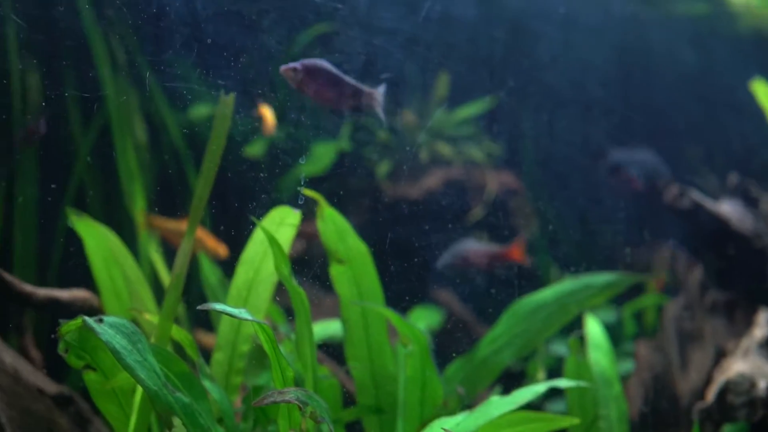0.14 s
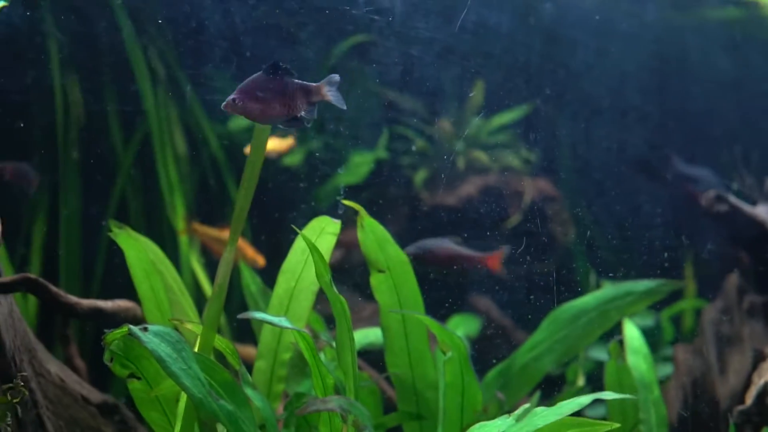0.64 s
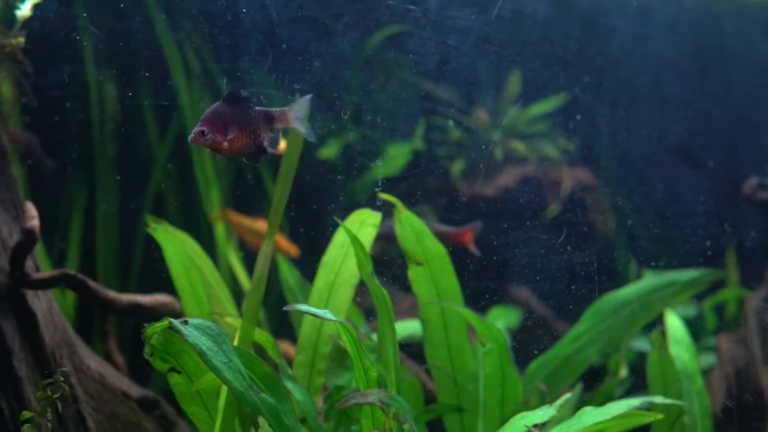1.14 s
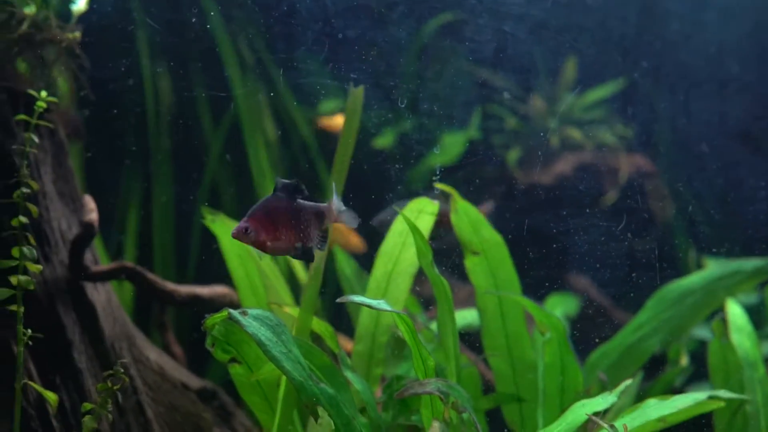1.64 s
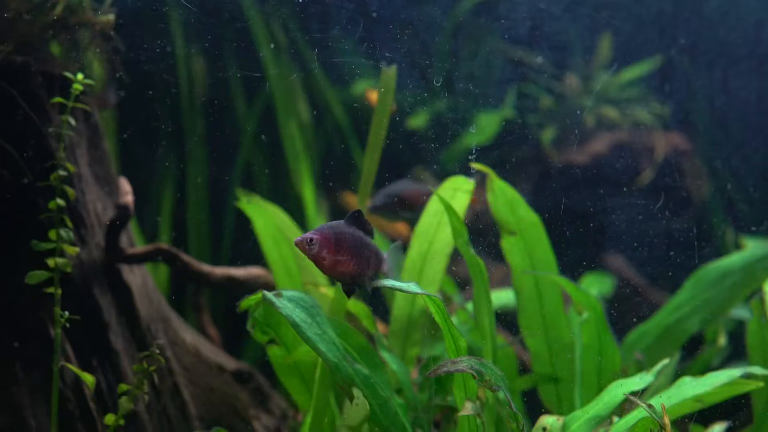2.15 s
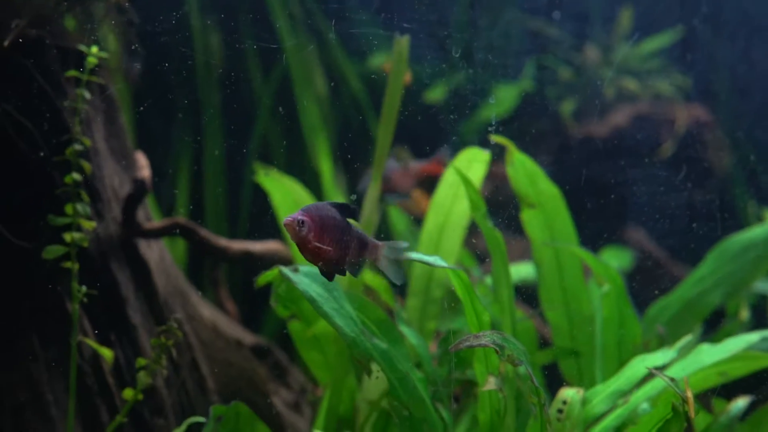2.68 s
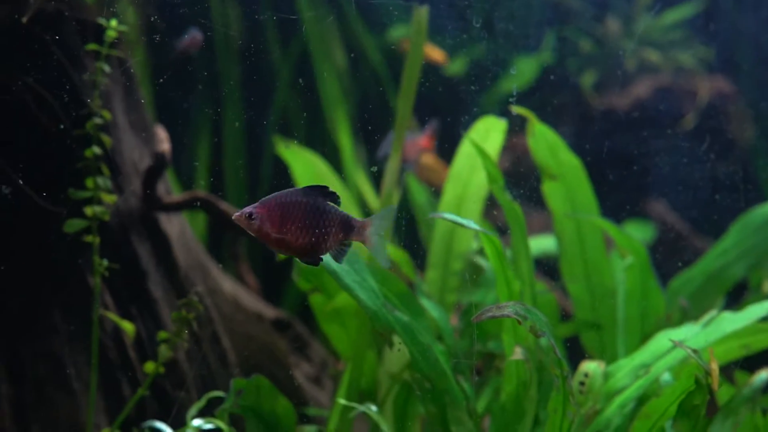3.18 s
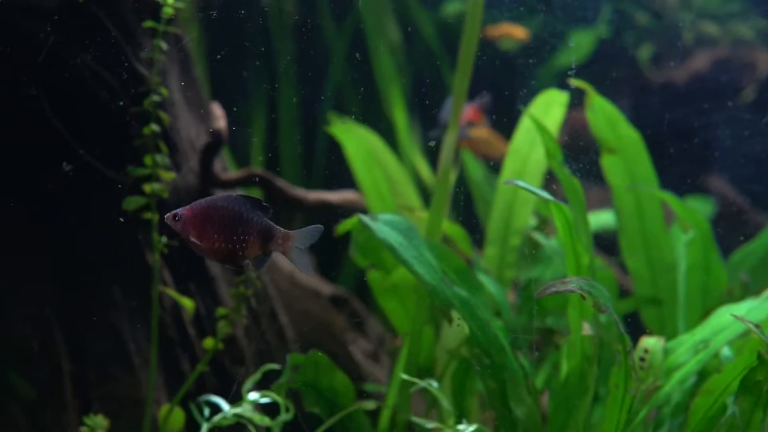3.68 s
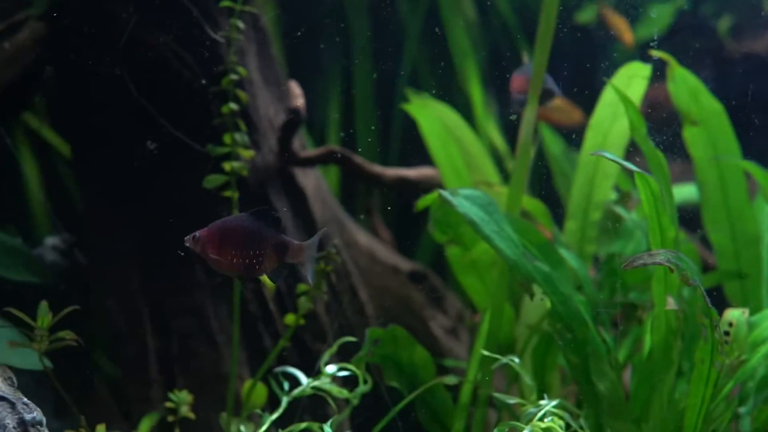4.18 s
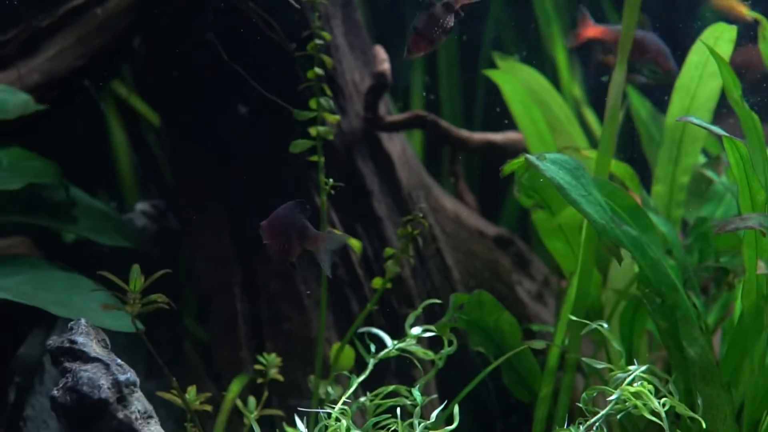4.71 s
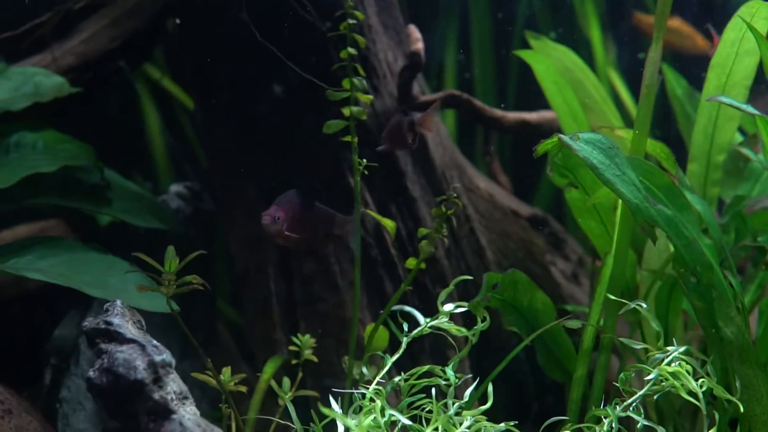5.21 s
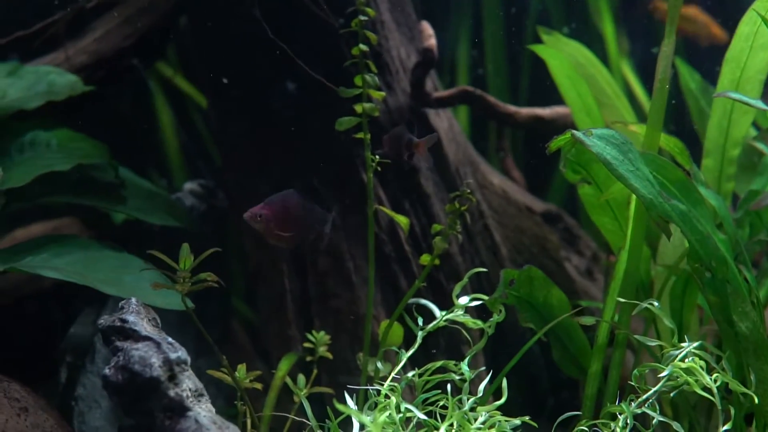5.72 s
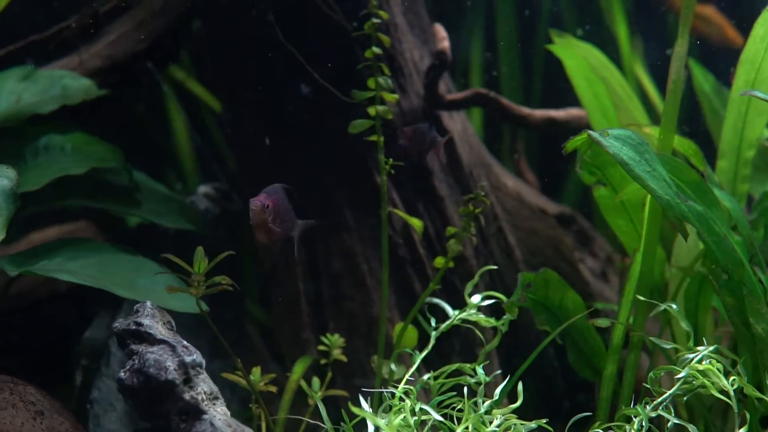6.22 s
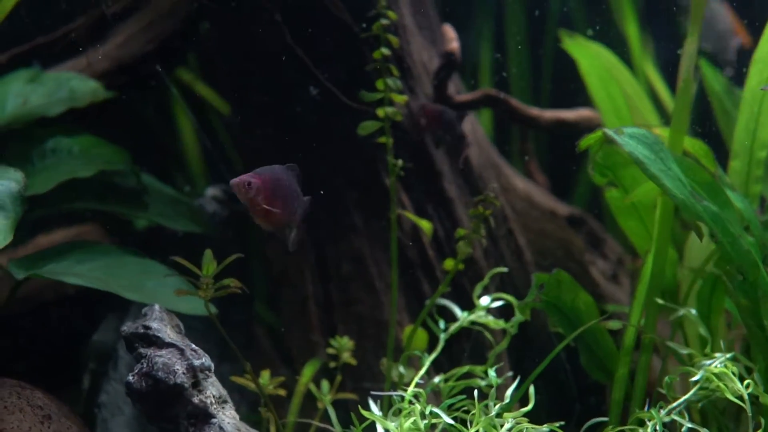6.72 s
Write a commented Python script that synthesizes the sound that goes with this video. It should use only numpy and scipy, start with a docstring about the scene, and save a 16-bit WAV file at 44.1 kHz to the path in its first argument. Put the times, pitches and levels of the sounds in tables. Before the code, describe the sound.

Steady electric pump hum over a soft low rumble, faint watery trickle with scattered ringing drips, and a tiny rapid ticking close by.

```python
"""In a quiet room a mains-driven aquarium pump hums in steady harmonics, with a second tone beside them.
Low rumble swells beneath: wavering sines and noise narrowed to the room's resonances. Water trickles back
as flickering bands of stereo noise, with clear ringing drops and tiny splashes of narrow noise.
Close to the microphones a small lens drive ticks about sixty times a second, rattling its housing,
and fingers shift, click and rustle on it in short bursts of filtered noise."""
import sys
import numpy as np
from scipy import signal
from scipy.io import wavfile
from scipy.ndimage import uniform_filter1d

SR = 44100
rng = np.random.default_rng(int(sys.argv[2]) if len(sys.argv) > 2 else 0)


def volts_from_db(level):
    """Convert decibel levels to linear amplitude ratios."""
    exponent = np.asarray(level, float) / 20
    return 10 ** exponent


def generate_wav(signal):
    """Clip the signal to [-1, 1] and save it as 16-bit WAV at the path in sys.argv[1]."""
    frames = np.transpose(np.atleast_2d(signal))
    scaled = np.clip(frames, -1, 1) * 32767
    pcm = np.round(scaled).astype(np.int16)
    wavfile.write(sys.argv[1], SR, pcm)


N = 302526
T = np.arange(N) / SR

# pump harmonics: [multiple of the mains, level/dB rms]
PUMP_HARMONICS = [(2, -60.5), (3, -49.5), (4, -42.5), (5, -44.5), (6, -61), (8, -60.5), (10, -80.5),
                  (12, -80)]
# deepest rumble, like a far engine that speeds up: [t/s, level/dB rms, f/Hz]
DEEP_RUMBLE = [(0, -62, 30.7), (.55, -50, 30.7), (1.0, -48.5, 31.8), (1.3, -59, 30.1), (2.15, -60, 29.1),
               (2.49, -35, 30.87), (2.73, -58, 30.9), (3.1, -53, 30.96), (3.68, -47, 29.9),
               (4.0, -63, 28.96), (4.15, -48, 28.6), (4.99, -35, 30.4), (5.33, -33, 31.24),
               (5.52, -36.5, 31.9), (5.75, -54, 31.75), (5.88, -40, 32.14), (6.34, -52, 38),
               (6.86, -54, 42.5)]
# lowest hum, which wavers: [t/s, level/dB rms]
LOWEST_HUM = [(0, -50), (.23, -45), (.9, -48.5), (1.09, -67), (1.36, -40.5), (1.95, -48), (2.65, -58),
              (3.05, -40.5), (3.32, -45.5), (3.74, -40.5), (4.03, -44.5), (4.34, -42.5), (5.2, -49.5),
              (5.54, -40), (5.98, -56), (6.19, -42), (6.5, -47), (6.86, -43.5)]
# swells of the drone: [centre t/s, level at the centre/dB rms, length/s, f/Hz]
DRONE_SWELLS = [(0.805, -54, .3, 86.5), (2.31, -49, .2, 80), (4.297, -50, .45, 85.4), (4.87, -51, .4, 90.5),
                (6.351, -51.5, 0.47, 77)]
# room resonances: [f/Hz, width/Hz, level against the rumble curve/dB]
ROOM_MODES = [(27.3, 8.9, -5), (51.2, 14.4, -4.5), (118, 11, -11.5), (149.2, 16.2, -5.5), (182, 10, -13.5),
              (210.5, 15, 1), (242.1, 29.7, -4), (289, 25, -17)]
# rumble curve for all the room resonances: [t/s, level/dB]
ROOM_RUMBLE = [(0, -46.5), (1.3, -47), (2.4, -48), (2.85, -46.5), (3.9, -47.5), (4.6, -45.5), (5.5, -47.5),
               (6.2, -49), (6.86, -45.5)]
# boom: [t/s, level/dB rms]
BOOM_LEVEL = [(0, -53.5), (.7, -61), (3.7, -61), (4.1, -54.5), (4.97, -52), (5.25, -61), (6.86, -62.5)]
# trickle and its fizz over time: [t/s, water level/dB, fizz level/dB]
TRICKLE_LEVELS = [(0, -52.5, -64.5), (.5, -53, -68), (1.0, -54.5, -68.5), (1.95, -55, -66.5),
                  (3.8, -55, -68.5), (4.55, -55, -63.5), (5.9, -56.5, -68), (6.57, -57.5, -68.5),
                  (6.86, -55.5, -67)]
# tone colour of the trickle: [f/Hz, relative level/dB]
WATER_SPECTRUM = [(60, -25.5), (180, -4), (400, 2.5), (550, 2), (850, 2), (1100, 0), (1500, -2.5),
                  (2000, -7.5), (3200, -11.5), (4200, -12), (5500, -21), (11000, -33.5)]
# how alike the trickle is left and right: [f/Hz, likeness 0-1]
WATER_LIKENESS = [(60, .9), (200, 0.21), (400, 0.34), (600, 0.59), (1200, 0.42), (2500, 0.21),
                  (5000, 0.089), (11000, 0.27)]
# resonances of the air above the water: [f/Hz, width/Hz, level against the plain trickle/dB]
AIR_RESONANCES = [(887, 41, -24), (1310, 130, -16.5), (1480, 39, -3), (1720, 50, -14), (2560, 210, -2),
                  (3000, 180, -13.5)]
# resonances of the lens drive's housing: [f/Hz, relative level/dB, t60/s]
HOUSING_RESONANCES = [(1770, 8.5, 0.0053), (3745, -3, 0.021), (3964, -3.5, 0.015), (4190, -8, 0.019),
                      (6020, -7.5, 0.0048)]
# clear drops: [t/s, level before swell and decay/dB, f/Hz, roughness (0 smooth, 1 all shaken)]
CLEAR_DROPS = [(.059, -44, 1350, 0), (.432, -53, 2880, 0.5), (1.817, -38.5, 2180, .3),
               (1.876, -48, 2940, .9), (1.93, -53, 3000, .9), (2.661, -34.5, 2974, .3),
               (2.682, -42, 2040, 0.36), (2.757, -39, 1520, 0.56), (3.814, -40.5, 2035, 0.18),
               (3.945, -47, 3270, .3), (4.1, -49, 2140, 0.3), (4.17, -49, 1480, 0.54),
               (4.448, -39, 2265, 0.6), (4.59, -44.5, 3140, 0.48), (4.879, -42, 2071, 0.75),
               (5.155, -45, 4555, 0.4), (5.24, -50.5, 2380, 0.91), (5.71, -50, 2564, 1.05),
               (5.773, -46.5, 2230, .8), (5.877, -34, 2406, 0.12), (6.26, -48, 2290, 0.7)]
# tiny splashes: [t/s, level before swell and decay/dB rms, f/Hz]
TINY_SPLASHES = [(0.591, -56, 10100), (.6, -64, 6100), (.813, -65, 8900), (1.222, -58, 5940),
                 (1.223, -62, 7800), (1.88, -58.5, 8340), (1.95, -54.5, 8800), (2.495, -66, 9000),
                 (2.92, -61, 5000), (3.19, -63, 5560), (3.845, -64, 7330), (4.077, -62, 7400),
                 (4.127, -61, 9050), (4.401, -60, 9600), (4.6, -63, 8310), (4.655, -65, 8270),
                 (4.993, -58, 6000), (4.995, -62, 10000), (5.068, -56, 5200), (5.711, -57, 5400),
                 (5.894, -61, 7500)]
# finger clicks on the housing: [t/s, peak level before panning/dB, low edge f/Hz, high edge f/Hz, L-R level/dB]
FINGER_CLICKS = [(4.4544, -34.5, 2800, 10900, -2), (5.5005, -37, 397, 1110, -1),
                 (5.5105, -43, 3200, 9500, -6)]

MAINS_HZ, FIRST_STROKE_S = 50.0935, .0071
SECOND_TONE_HZ, SECOND_TONE_DB = 143.89, -57
DRONE_HZ, DRONE_WIDTH_HZ, DRONE_DB, SWELL_WIDTH_HZ = 83.2, 12, -58.5, 3.9
BOOM_HZ, BOOM_WIDTH_HZ = 337.4, 92
WATER_LEFT_OVER_RIGHT_DB = 1
WHISTLE_HZ, WHISTLE_WIDTH_HZ = 865, 35
WHISTLE_DB, WHISTLE_HOLD_S, WHISTLE_FADE_DB_PER_S = -67, 1.6, 4
HANDS_DB, HANDS_LUMPY_DB = -66.5, 5.5
STEPS_PER_S, FIRST_STEP_S = 59.94, .0008
ODD_STEP_SHIFT_S = -.0014  # every other step comes early
STEP_DB = -56  # strength that drives the rattle
RATTLE_SHARED = 0.46  # share of the rattle that both microphones hear alike
DROP_T60_S, DROP_SWELL_S, DROP_TAIL_DB, DROP_TAIL_T60_S = 0.083, 0.009, -14.5, 0.58
SHAKE_WIDTH = 0.043  # half-width of the shaken band, as a share of the drop's pitch
ROOM_T60_S, WALL_CUT_HZ, ROOM_DB = .45, 7000, -15
SPLASH_T60_S, SPLASH_SWELL_S, SPLASH_TAIL_DB, SPLASH_TAIL_T60_S = 0.083, 0.0043, -9, 0.49
RUSTLE_START_S, RUSTLE_LENGTH_S, RUSTLE_DB, RUSTLE_SAG_DB_PER_S = 6.635, 0.131, -50, 58
TOP_CUT_HZ = 11030


def rms_one(x):
    """Scales to unit rms."""
    return x / np.sqrt(np.mean(x ** 2) + 1e-20)


def in_time(rows):
    """Table columns as curves, sample by sample."""
    s, *columns = np.transpose(rows)
    return [np.interp(T, s, c) for c in columns]


def at_hz(points, hz):
    """Reads a spectrum on a log-frequency axis."""
    point_hz, value = np.transpose(points)
    return np.interp(np.log(hz), np.log(point_hz), value)


def drift(rate):
    """Slow random wander of unit rms, smoothed by two poles at rate Hz."""
    r = np.exp(-80 * np.pi * rate / SR)  # one point every 40 samples
    slow = signal.lfilter([1], [1, -2 * r, r * r], rng.standard_normal(N // 40 + 2002))
    slow = rms_one(slow[2000:])  # past the filter's start-up
    return np.interp(np.arange(N) / 40, np.arange(len(slow)), slow)


def band(x, low_hz, high_hz):
    """Second-order band-pass."""
    return signal.sosfilt(signal.butter(2, [low_hz, high_hz], "band", fs=SR, output="sos"), x)


def ring(clicks, hz, t60):
    """A unit click sets a decaying sine of starting height 1 ringing."""
    r, w = volts_from_db(-60 / (t60 * SR)), 2 * np.pi * hz / SR
    return signal.lfilter([0, np.sin(w)], [1, -2 * r * np.cos(w), r * r], clicks + 1e-18)


def resonant_noise(hz, width_hz):
    """Noise of unit rms in one resonance, already sounding at the start."""
    noise = rng.standard_normal(N + SR // 2)
    return rms_one(band(noise, hz - width_hz / 2, hz + width_hz / 2)[-N:])


def dying(t, t60, tail_db, tail_t60):
    """A quick decay that gives way to a fainter, longer tail."""
    return volts_from_db(-60 * t / t60) + volts_from_db(tail_db - 60 * t / tail_t60)


def pump():
    """Every stroke is alike, so the harmonics keep in step; the left hears them a little later."""
    t = T - FIRST_STROKE_S + np.array([[-1], [1]]) * 2.5e-5
    hum = sum(volts_from_db(db) * np.cos(2 * np.pi * k * MAINS_HZ * t) for k, db in PUMP_HARMONICS)
    second_tone = volts_from_db(SECOND_TONE_DB) * np.sin(2 * np.pi * SECOND_TONE_HZ * t)
    return np.sqrt(2) * (hum + second_tone)  # rms to peak


def rumble():
    """Far rumble fills the room resonances; the deepest is nearly a tone, the lowest hum wavers."""
    deep_db, deep_hz = in_time(DEEP_RUMBLE)
    deep_cycles = np.cumsum(deep_hz) / SR + 0.05 * drift(0.57)
    deep = np.sqrt(2) * volts_from_db(deep_db) * np.sin(2 * np.pi * deep_cycles)
    lowest_cycles = MAINS_HZ * T + 0.15 * drift(0.98)
    lowest = np.sqrt(2) * volts_from_db(in_time(LOWEST_HUM)[0]) * np.sin(2 * np.pi * lowest_cycles)
    drone = volts_from_db(DRONE_DB) * resonant_noise(DRONE_HZ, DRONE_WIDTH_HZ)
    swells = 0
    for s, db, length, hz in DRONE_SWELLS:
        rise_and_fall = np.exp(-2 * ((T - s) / length) ** 2)
        swells = swells + volts_from_db(db) * rise_and_fall * resonant_noise(hz, SWELL_WIDTH_HZ)
    modes = sum(volts_from_db(db) * resonant_noise(hz, width_hz) for hz, width_hz, db in ROOM_MODES)
    boom = volts_from_db(in_time(BOOM_LEVEL)[0]) * resonant_noise(BOOM_HZ, BOOM_WIDTH_HZ)
    return deep + lowest + drone + swells + volts_from_db(in_time(ROOM_RUMBLE)[0]) * modes + boom


def air_above_water(x):
    """Adds the narrow resonances of the air to the sound that passes."""
    out = x
    for hz, width_hz, db in AIR_RESONANCES:
        r = np.exp(-np.pi * width_hz / SR)
        poles = [1, -2 * r * np.cos(2 * np.pi * hz / SR), r * r]
        out = out + volts_from_db(db) * signal.lfilter([(1 - r * r) / 2, 0, (r * r - 1) / 2], poles, x)
    return out


def trickle(patchy_db):
    """Third-octave bands of stereo noise, each with its level, flicker and likeness; fizz on top."""
    water, together = 0, drift(6.0)
    edges = 56 * 2 ** (np.arange(24) / 3)
    white = rng.standard_normal((2, 2, N))
    for k, (low, high) in enumerate(zip(edges, edges[1:])):
        mid, side = band(white[k % 2], low, high)  # neighbouring bands use separate noise
        hz = np.sqrt(low * high)
        alike = np.clip(at_hz(WATER_LIKENESS, hz), 0, 1)
        flicker_db = patchy_db * (.5 * together + drift(21))
        stereo = np.sqrt(1 + alike) * mid + np.sqrt(1 - alike) * side * [[1], [-1]]
        water = water + volts_from_db(at_hz(WATER_SPECTRUM, hz) + flicker_db) * stereo
    water_db, fizz_db = in_time(TRICKLE_LEVELS)
    noise = rng.standard_normal((3, N))
    fizz = rms_one(band(noise[:2] + 0.4 * noise[2], 3660, 12700))
    balance_db = WATER_LEFT_OVER_RIGHT_DB * np.array([[.5], [-.5]])
    water = volts_from_db(water_db + balance_db) * rms_one(air_above_water(water))
    return water + volts_from_db(fizz_db + patchy_db * together) * fizz


def whistle():
    """The trickle sings weakly in one narrow noise band that holds, then fades."""
    fade_db = WHISTLE_FADE_DB_PER_S * np.maximum(T - WHISTLE_HOLD_S, 0)
    return volts_from_db(WHISTLE_DB - fade_db) * resonant_noise(WHISTLE_HZ, WHISTLE_WIDTH_HZ)


def hands():
    """The held housing shifts a little: lumpy low noise, opposite in the two microphones."""
    noise = rms_one(band(rng.standard_normal(N), 85, 330))
    return volts_from_db(HANDS_DB + HANDS_LUMPY_DB * drift(3.0)) * noise * [[1], [-1]]


def lens_drive(habit_db, chance_db):
    """Steps come in fours, each place of slowly changing strength; each rattles the housing briefly."""
    k = np.arange(int(N / SR * STEPS_PER_S) - 1)
    at = np.round((FIRST_STEP_S + k / STEPS_PER_S + ODD_STEP_SHIFT_S * (k % 2)) * SR).astype(int)
    habits = np.tanh([drift(1.3) for place in range(4)])
    chance = 2 * rng.random(len(k)) - 1
    steps = np.zeros(N)
    steps[at] = volts_from_db(STEP_DB + habit_db * habits[k % 4, at] + chance_db * chance)
    fade = np.exp(-1 / (0.0025 * SR))  # the rattle dies with a 2.5 ms time constant
    signs = rng.choice([-1, 1], (3, N))
    signs = np.where(rng.random(N) < RATTLE_SHARED, signs[2], signs[:2])
    rattle = signal.lfilter([1], [1, -fade], steps) * np.sqrt(1 - fade ** 2) * signs
    return sum(volts_from_db(db) * ring(rattle, hz, t60) for hz, db, t60 in HOUSING_RESONANCES)


def drops(small_per_s, small_db):
    """Each drop traps a bubble that rings unevenly, shaken by the moving surface; many faint ones join."""
    out, t = np.zeros(N + SR), np.arange(SR // 4) / SR
    shape = dying(t, DROP_T60_S, DROP_TAIL_DB, DROP_TAIL_T60_S) * (1 - np.exp(-t / DROP_SWELL_S))
    for s, db, hz, rough in CLEAR_DROPS:
        i = round(s * SR)
        noise = rng.standard_normal(2 * len(t))
        shaken = band(noise, (1 - SHAKE_WIDTH) * hz, (1 + SHAKE_WIDTH) * hz)[len(t):]
        shaken = .7 * rms_one(shaken)  # about as strong as the sine
        bubble = np.sin(2 * np.pi * hz * t * (1 + .3 * t)) * np.exp(-t / .02)  # pitch creeps up
        out[i:i + len(t)] += volts_from_db(db) * shape * ((1 - rough) * bubble + rough * shaken)
    # faint drops at random moments, dealt to 16 pitches; higher ones are weaker and shorter
    sizes = volts_from_db(small_db + 3 * np.minimum(rng.exponential(1, N), 2))
    born, dealt = rng.random(N) < small_per_s / SR, rng.integers(0, 16, N)
    small = 0
    for k, hz in enumerate(np.geomspace(1200, 10000, 16)):
        small = small + ring(sizes * born * (dealt == k), hz, 120 / hz) * (1000 / hz) ** 0.81
    return out[:N] + small


def room(x):
    """Six feedback delays a side, duller on every round."""
    out, dull = np.zeros((2, N)), np.exp(-2 * np.pi * WALL_CUT_HZ / SR)
    lags = (rng.uniform(.008, 0.042, 12) * SR).astype(int)
    for k, lag in enumerate(lags):
        loop, gain, state = x.copy(), volts_from_db(-60 * lag / SR / ROOM_T60_S), [0.]
        for i in range(lag, N, lag):
            back, state = signal.lfilter([gain * (1 - dull)], [1, -dull], loop[i - lag:i], zi=state)
            loop[i:i + lag] += back[:N - i]
        out[k % 2] += (loop - x) * (-1) ** (k // 2)  # echoes only, in alternating polarity
    return out


def splashes(width, shared):
    """A spray of fine bubbles: a puff of narrow noise that dies away, partly shared by the two ears."""
    out, t = np.zeros((2, N + SR)), np.arange(SR // 4) / SR
    swell = 1 - np.exp(-t / SPLASH_SWELL_S)
    shape = swell * dying(t, SPLASH_T60_S, SPLASH_TAIL_DB, SPLASH_TAIL_T60_S)
    for s, db, hz in TINY_SPLASHES:
        i, noise = round(s * SR), rng.standard_normal((3, len(t)))
        puff = rms_one(band(noise[:2] + shared * noise[2], hz * (1 - width), hz * (1 + width)))
        out[:, i:i + len(t)] += volts_from_db(db) * shape * puff
    return out[:, :N]


def fingers():
    """Short taps on the housing, each a blow with a little rattle, and one dull rustle."""
    out, t = np.zeros((2, N)), np.arange(SR // 20) / SR
    for s, db, low_hz, high_hz, pan_db in FINGER_CLICKS:
        cycles = t * np.sqrt(low_hz * high_hz)
        rattle = rng.standard_normal((2, len(t))) * np.exp(-cycles / 7) * np.sqrt(low_hz / SR) * 1.3
        blow = t == 0
        burst = band(band(blow + rattle, low_hz, high_hz), low_hz, high_hz)
        i = round(s * SR)
        sides_db = db + np.array([[pan_db], [-pan_db]]) / 2
        out[:, i:i + len(t)] += volts_from_db(sides_db) * burst / np.max(np.abs(burst))
    during = 1. * (T > RUSTLE_START_S) * (T < RUSTLE_START_S + RUSTLE_LENGTH_S)
    during = uniform_filter1d(during, size=600)  # soft edges
    rub = rms_one(signal.lfilter([1], [1, -.95], band(rng.standard_normal(N), 297, 1350)))
    rustle_db = RUSTLE_DB - RUSTLE_SAG_DB_PER_S * np.maximum(T - RUSTLE_START_S, 0)
    return out + volts_from_db(rustle_db) * during * rub


def scene():
    """All sources at the two microphones; the drops also sound in the room."""
    clear = drops(small_per_s=40, small_db=-59.0)
    water = trickle(patchy_db=1.28) + whistle() + clear + volts_from_db(ROOM_DB) * room(clear)
    water = water + splashes(width=0.1, shared=0.65)
    near = hands() + lens_drive(habit_db=4.0, chance_db=2.5) + fingers()
    return pump() + rumble() + water + near


def low_pass(x):
    """Removes everything above the highest recorded frequency."""
    return signal.sosfilt(signal.butter(12, 11730, fs=SR, output="sos"), x)


def record(dry):
    """Close-set microphones hear hardly any difference in the deep bass; the top is cut steeply."""
    mid, side = (dry[0] + dry[1]) / 2, (dry[0] - dry[1]) / 2
    side = signal.sosfilt(signal.butter(3, 75, "high", fs=SR, output="sos"), side)
    both = np.array([mid + side, mid - side])
    mix = signal.sosfilt(signal.ellip(14, .5, 60, TOP_CUT_HZ, fs=SR, output="sos"), both)
    return low_pass(mix)


dry = scene()
out = record(dry)
generate_wav(out)
```